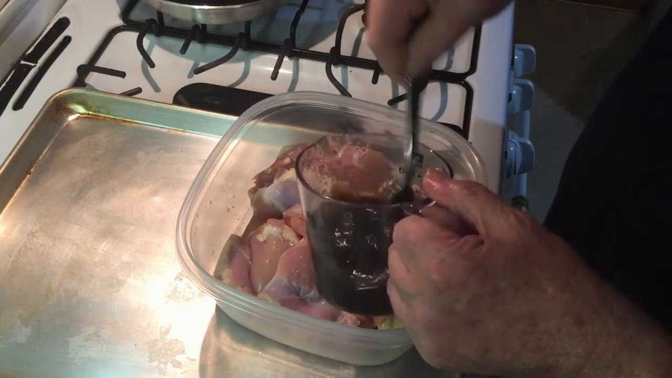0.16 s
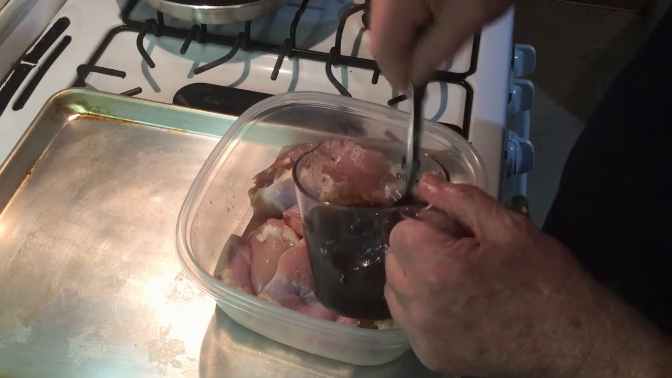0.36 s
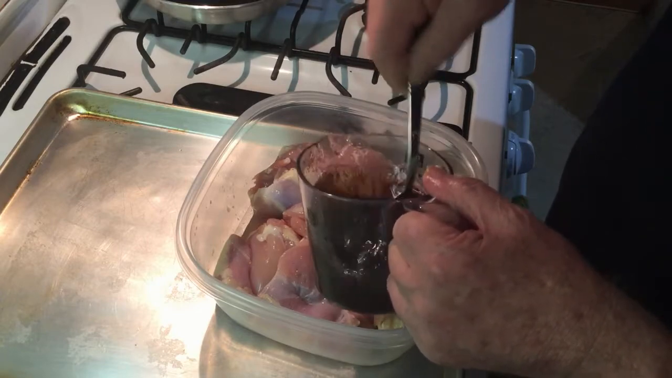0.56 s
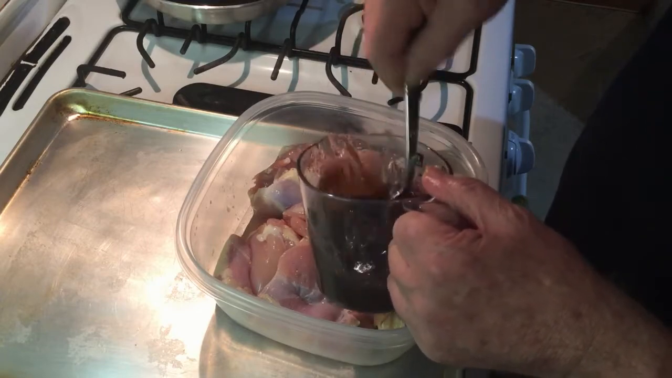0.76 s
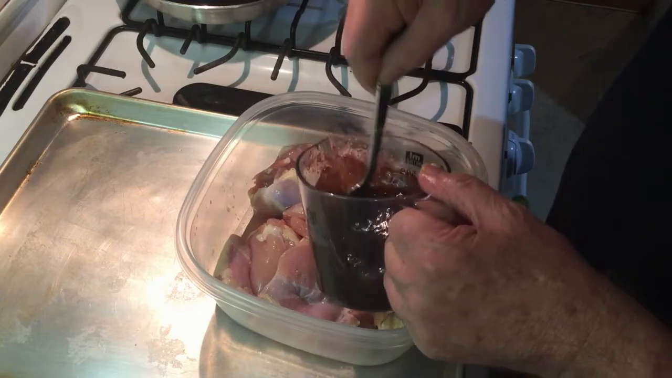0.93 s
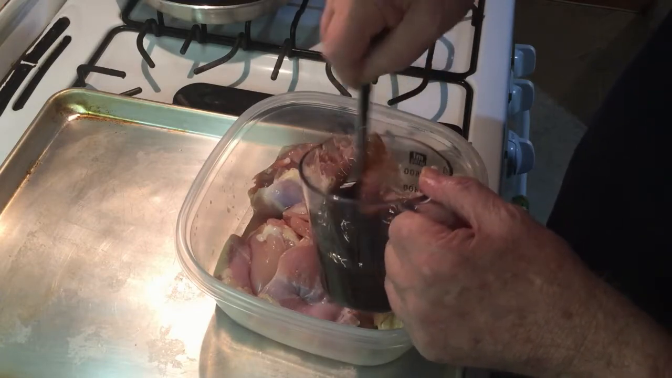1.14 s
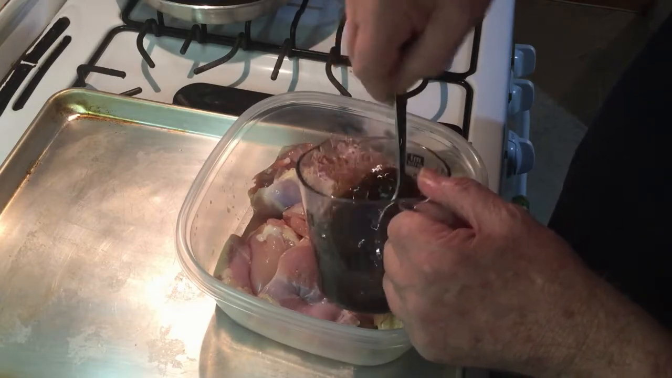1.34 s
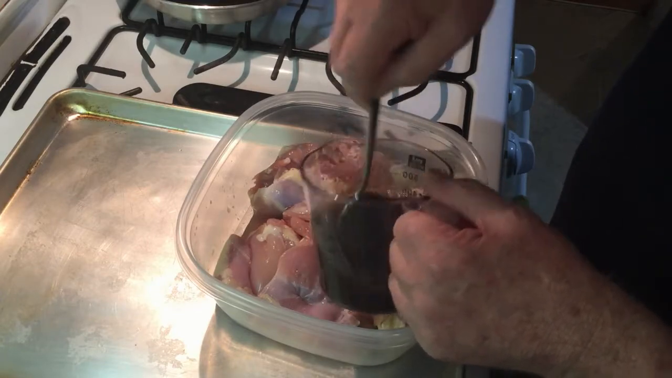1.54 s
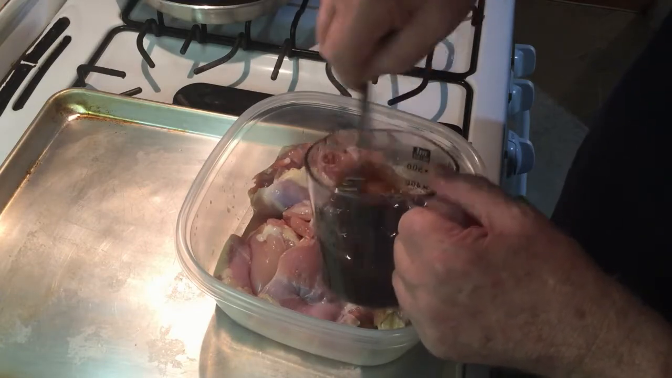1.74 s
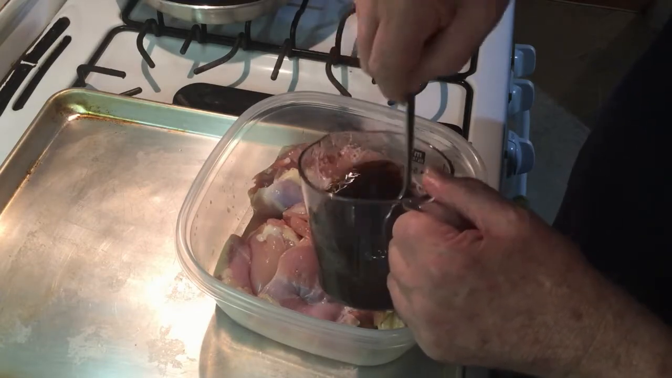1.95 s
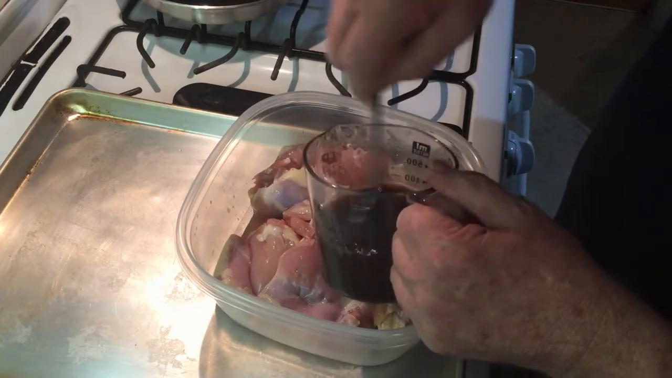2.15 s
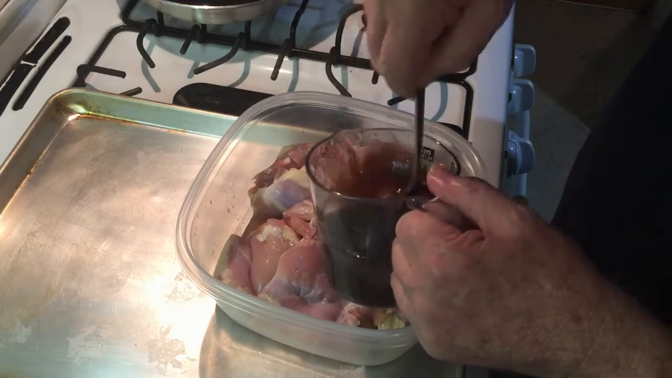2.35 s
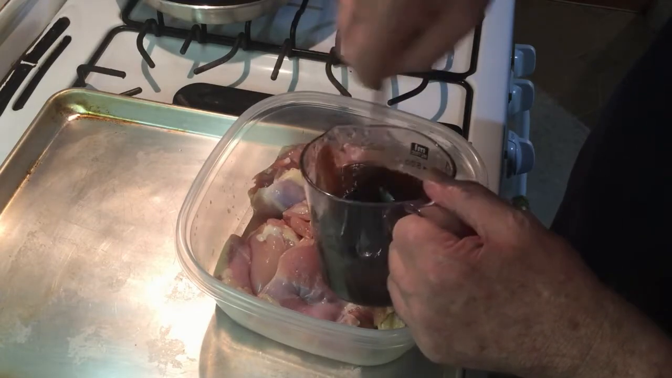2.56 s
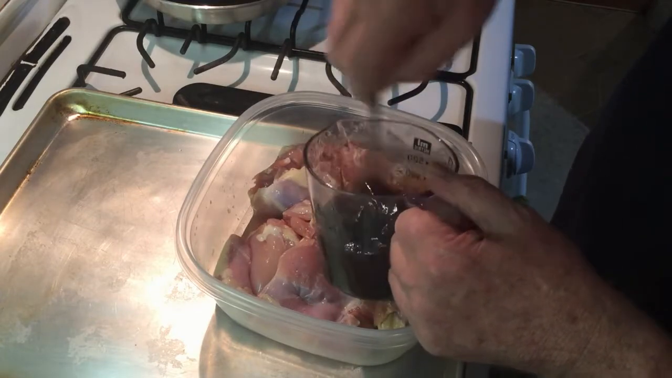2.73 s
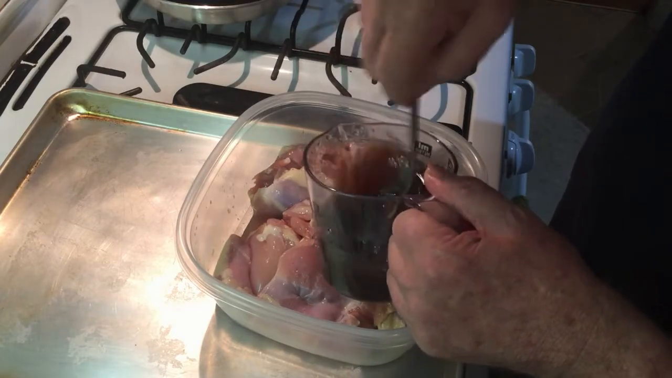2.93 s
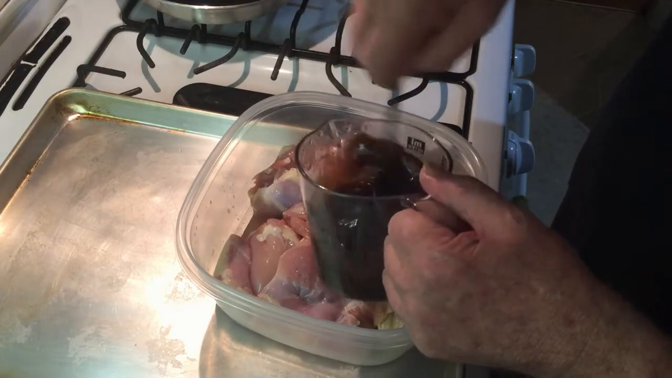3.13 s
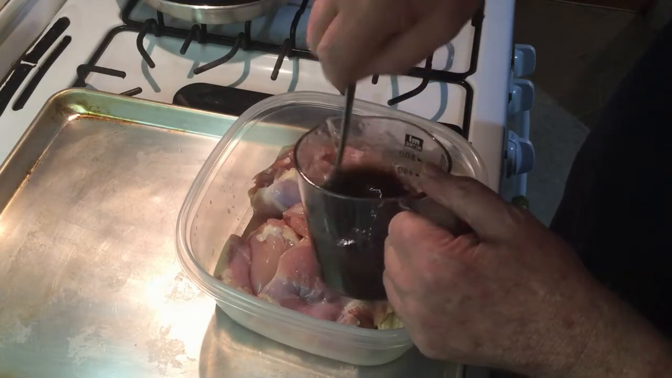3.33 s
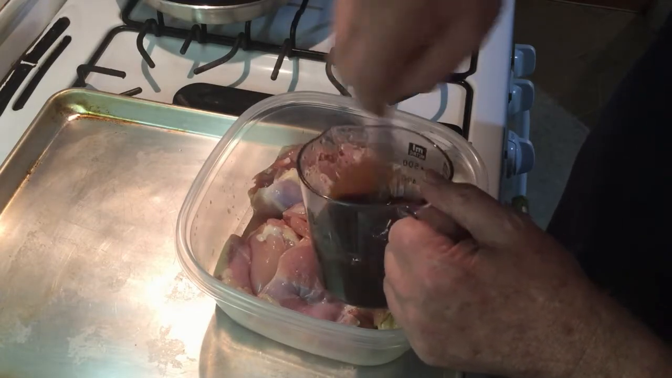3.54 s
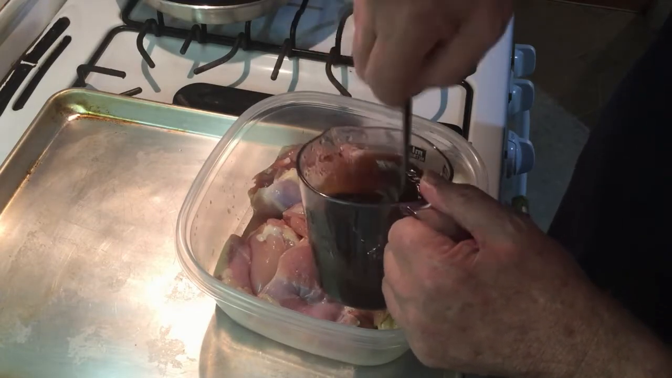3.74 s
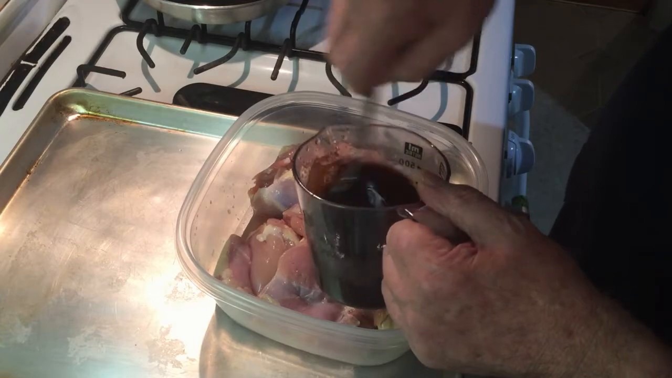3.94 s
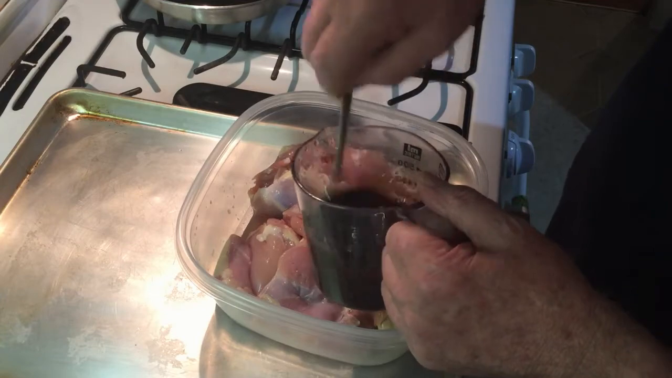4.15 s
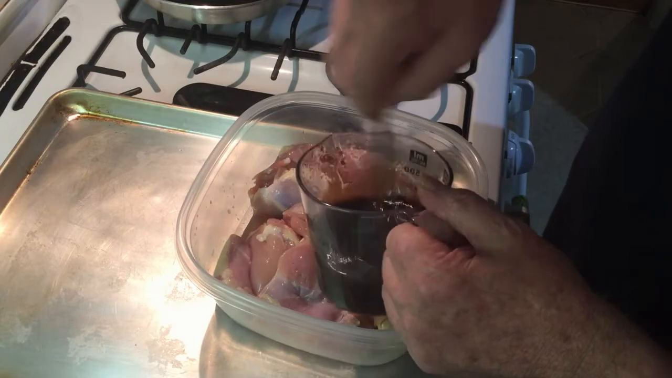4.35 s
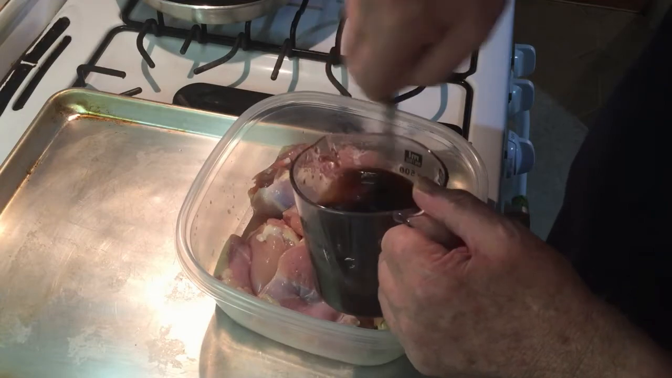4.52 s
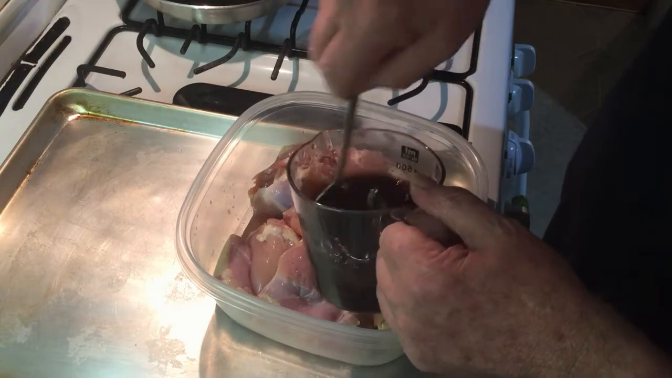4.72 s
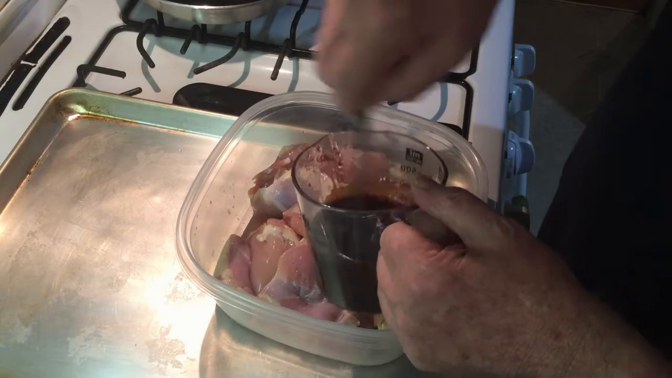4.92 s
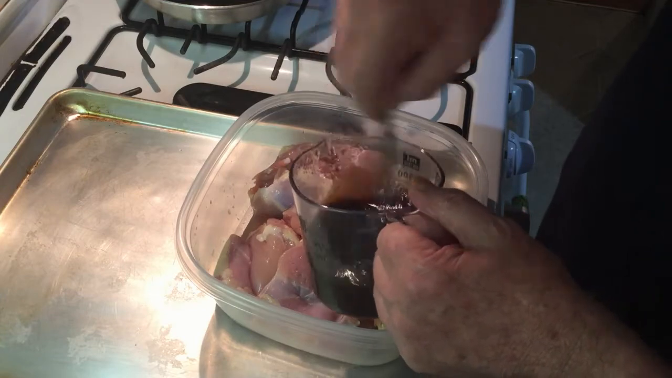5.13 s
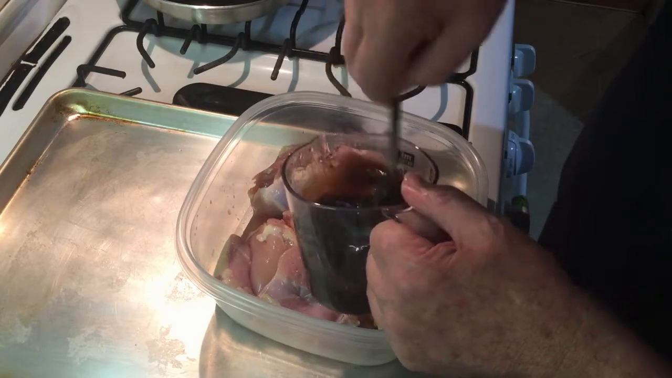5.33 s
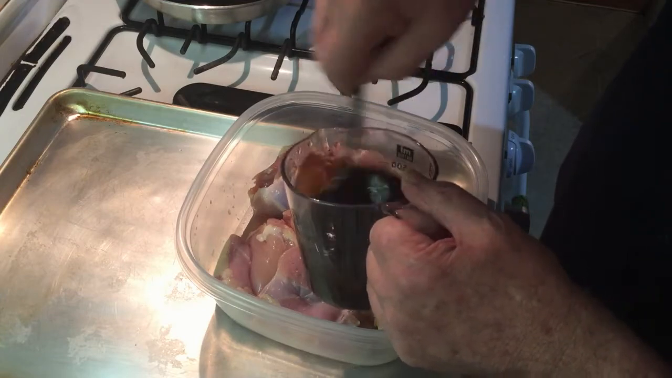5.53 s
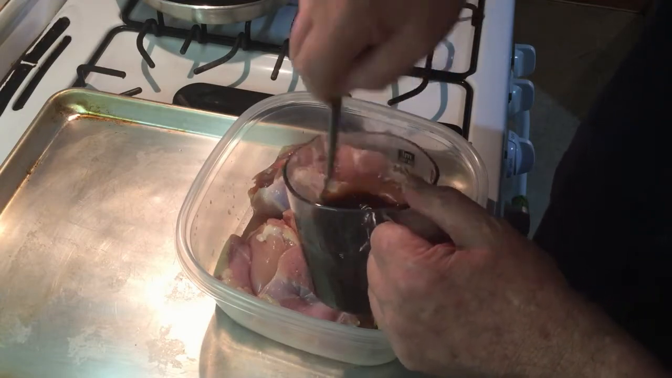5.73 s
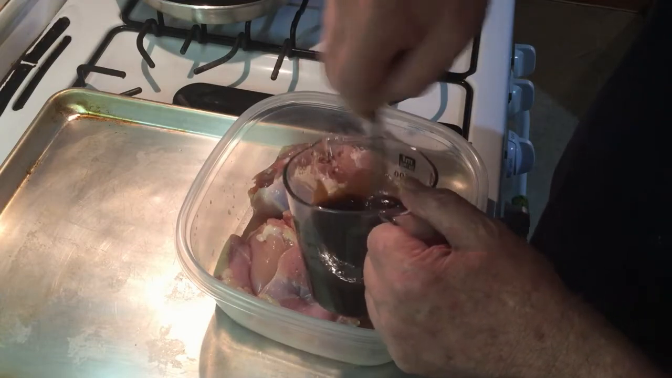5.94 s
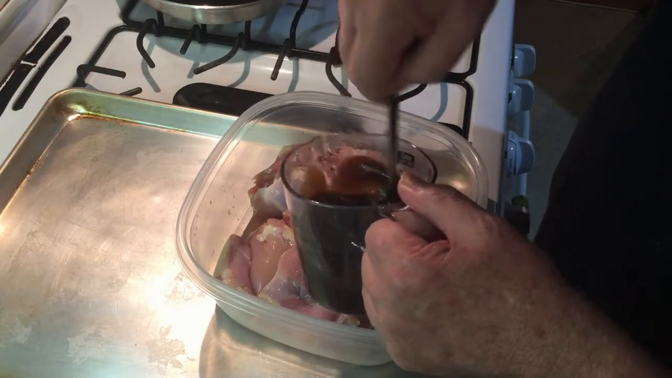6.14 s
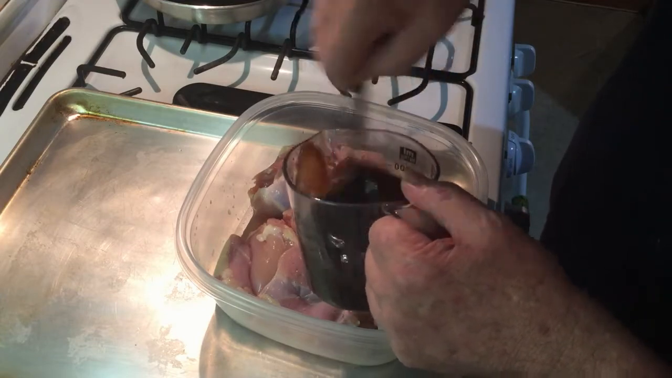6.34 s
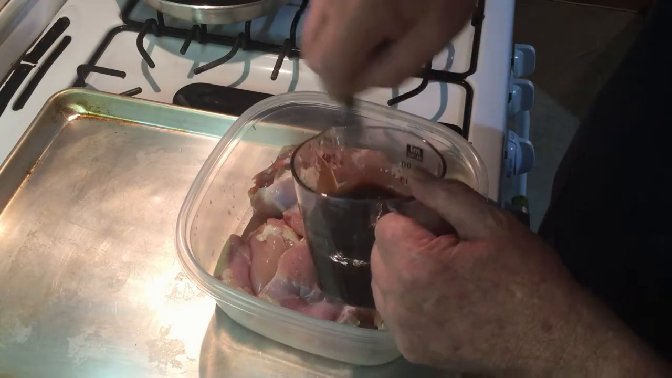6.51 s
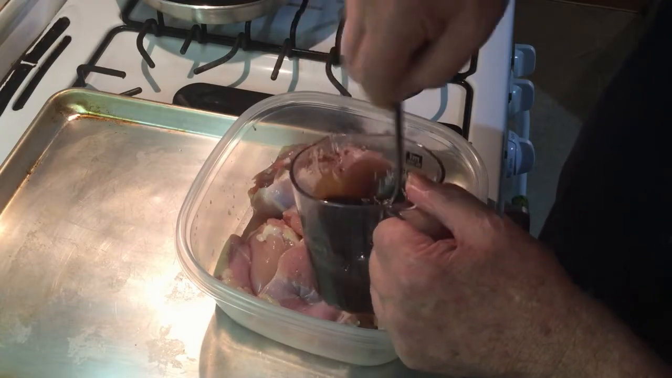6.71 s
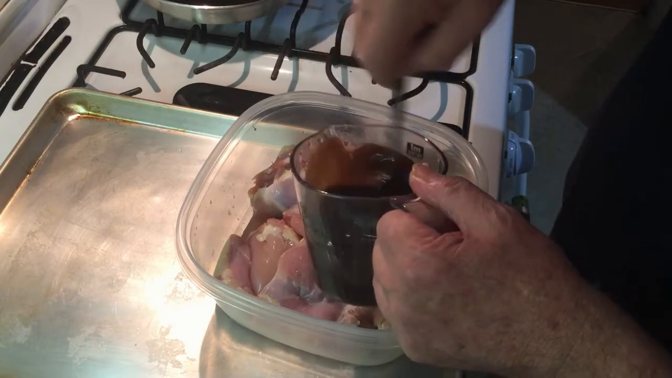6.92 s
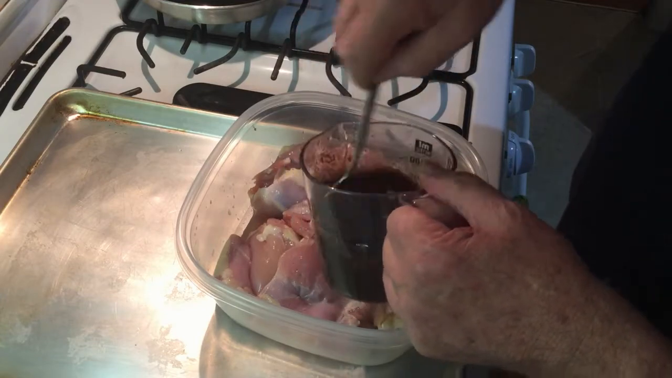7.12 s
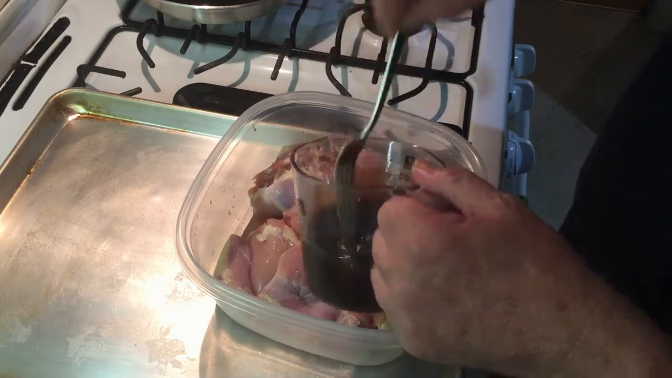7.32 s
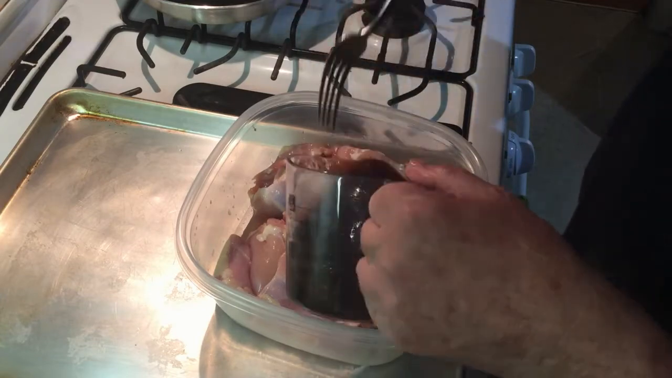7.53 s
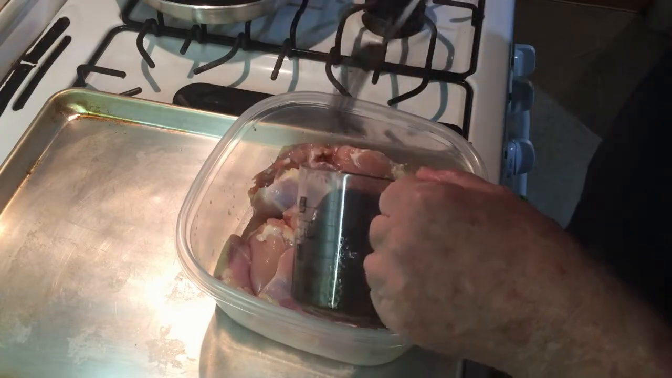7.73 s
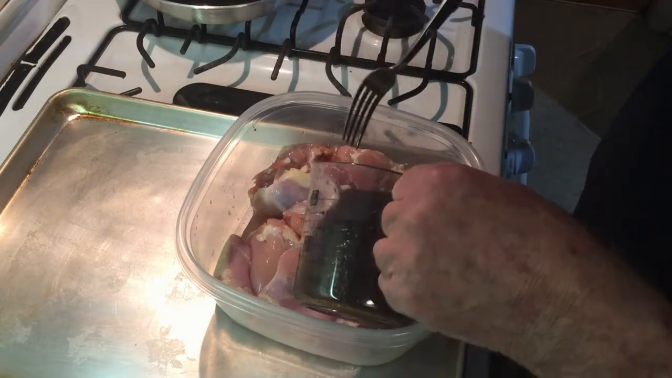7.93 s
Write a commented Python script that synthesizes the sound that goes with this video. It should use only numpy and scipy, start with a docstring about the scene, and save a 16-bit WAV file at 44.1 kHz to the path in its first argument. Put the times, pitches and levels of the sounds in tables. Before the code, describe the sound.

Close in a small, lightly echoing kitchen, a steel fork is already stirring thin sauce in a hand-held glass cup. From 0 to about 2 seconds the clacks are irregular, some sharp, others dull or glancing, with brief gritty scrapes, tiny squeaks and hollow watery plops. From about 2.3 seconds the stirring grows brisk and even, between three and four turns a second, hard clinks alternating with softer submerged taps. The liquid damps each ring to a short clack; a wet, bubbly swish surges after it and lulls before the next. Small rising gulps appear between roughly 2.8 and 4.4 seconds. The last strong clack comes near 6.9, followed by light taps and a faint click at 7.3. Stirring stops; around 7.8 and 8.0 come two soft, dull knocks on the cup, the second weaker. Faint air, low rumble and unsteady appliance hum remain underneath, the low end slightly fuller later.

```python
"""A steel fork stirs a thin sauce in a hand-held glass measuring cup, about 3.6 turns a second, in a small kitchen.
Its clacks, taps and knocks are damped resonances mixed with noise cracks; scrapes are rough noise strokes
and squeaks wavering sines. Plops and gulps are rising sines, and the swish is shifting noise with streams
of tiny bubbles that lulls before each contact and surges after each clack. The stirring stops and the cup
is knocked softly twice. Kitchen echoes surround it, over still air, rumble and a humming appliance."""
import sys
import numpy as np
from scipy import signal
from scipy.fft import rfft, irfft, next_fast_len
from scipy.io import wavfile
from scipy.ndimage import uniform_filter1d, map_coordinates

SR = 44100
rng = np.random.default_rng(int(sys.argv[2]) if len(sys.argv) > 2 else 0)


def persist_wave(psi):
    """Save psi, clipped to +-1, as 16-bit WAV."""
    counts = np.round(np.clip(psi, -1, 1) * 32767).astype(np.int16)
    wavfile.write(sys.argv[1], SR, np.atleast_2d(counts).T)


N = 355887
TIME = np.arange(N) / SR
AGE = np.arange(SR // 6) / SR  # seconds since a contact

# All levels are relative: each layer sets its own gain on top.
# fork against the wall: t/s, level/dB, body level/dB, edge level/dB, strongest ring f/Hz
CLACKS = [(0.165, -21.5, -18, -9.5, 2830), (0.2266, -23.5, -1, -14.5, 1730), (0.2375, -30, 3.5, -13, 1730),
          (0.373, -15.5, -27.5, -9, 3860), (0.5099, -23, -55, -1.5, 1960), (0.592, -17, -13, -2.5, 2770),
          (0.717, -25.5, -16.5, -10.5, 1620), (0.7835, -23, -8, -1, 3840), (0.836, -17, -17, -18, 3300),
          (0.8625, -21.5, -12, -8, 2500), (0.995, -22.5, -5, -6.5, 3770), (1.1077, -13.5, -13, -8.5, 1690),
          (1.1217, -17.5, -6.5, -22, 1630), (1.281, -22, -12.5, -19, 1600),
          (1.4816, -15.5, -7.5, -18, 2600), (1.6831, -15, -28, -5, 2070), (1.8063, -27, -15, -10.5, 2410),
          (1.9235, -24, -16, -10.5, 2930), (1.939, -26, -24.5, -0.5, 3440),
          (2.1109, -25.5, -45, -5.5, 1620), (2.193, -23.5, -21, -7, 3450), (2.298, -10, -12, -14.5, 1560),
          (2.3731, -22, -22, -15, 2100), (2.578, -16, -12, -4.5, 3180), (2.6304, -14.5, -12.5, -6, 2120),
          (2.864, -18, -12.5, -8, 2520), (2.9047, -13, -17, -9.5, 3300), (2.9678, -21.5, -41, -9.5, 2130),
          (3.118, -16.5, -9, -6.5, 2620), (3.185, -22, -12, -9, 1600), (3.413, -14.5, -14, -7.5, 3060),
          (3.4522, -15.5, -16.5, -11, 2010), (3.682, -14.5, -11, -8, 1880),
          (3.7335, -17.5, -12.5, -7.5, 1590), (3.958, -18, -11.5, -7, 2890), (4.2217, -15, -13, -4, 3000),
          (4.2575, -16, -7.5, -10, 3030), (4.47, -12, -15.5, -6.5, 3740), (4.5465, -15.5, -13, -15, 2500),
          (4.7531, -24, -7, 0.5, 2530), (4.8118, -21.5, -13, -11, 3850), (4.8693, -20.5, -15.5, -12, 3160),
          (5.0187, -15.5, -16, -6.5, 2600), (5.0731, -22, -10.5, -36, 3070), (5.143, -24, -4.5, -24, 1970),
          (5.1642, -22, -8.5, -13, 3360), (5.2888, -13, -13, -7, 3020), (5.6103, -21.5, -11, -12, 1620),
          (5.745, -22.5, -16.5, -10, 3370), (5.8322, -17.5, -12, -9, 3080),
          (5.8657, -14.5, -11, -13.5, 2850), (6.0981, -17.5, -13.5, -4, 4070),
          (6.132, -13.5, -11.5, -13, 2700), (6.1986, -20, -22, -13, 3440), (6.3767, -20, -8.5, -8.5, 2400),
          (6.3894, -11, -13.5, -10, 1610), (6.6166, -14.5, -14, -7.5, 3330),
          (6.666, -13.5, -13.5, -14.5, 1600), (6.9222, -13.5, -8.5, -8, 3450),
          (7.2935, -29.5, -31, -5, 3920)]
# tines tapping under the surface: t/s, level/dB, edge level/dB, strongest ring f/Hz
TAPS = [(0.193, -28.5, -10, 2250), (0.453, -31, -9, 2450), (0.563, -32.5, -8, 2480),
        (0.652, -26, -13, 3290), (1.2394, -24.5, -9, 3370), (1.4414, -31.5, -9.5, 1613),
        (1.5294, -29, -8.5, 3620), (2.0014, -32, -3.5, 3400), (2.4703, -23.5, -24, 2340),
        (2.6909, -20, -10.5, 3170), (2.7597, -20, -17.5, 3370), (3.037, -24, -16.5, 2290),
        (3.06, -34.5, 7, 3300), (3.2374, -25.5, -9.5, 3516), (3.31, -22.5, -37, 3280),
        (3.543, -27.5, -14, 3300), (3.567, -21, -35, 3300), (3.795, -25, -9, 3500),
        (3.8587, -21.5, -23, 3270), (4.0843, -26, -12.5, 1887), (4.1288, -22.5, -12.5, 1535),
        (4.335, -22, -16, 3170), (4.384, -28, -14.5, 3220), (4.5996, -25.5, -5.5, 3310),
        (4.6656, -18, -13.5, 3480), (4.683, -25.5, -18, 3420), (4.9403, -24, -28.5, 3360),
        (4.9605, -32.5, -5, 3380), (5.2102, -22.5, -17, 3430), (5.225, -23.5, -21, 3400),
        (5.355, -28.5, -11.5, 3636), (5.4152, -24, -13, 3400), (5.4751, -18, -19, 2214),
        (5.6721, -21, -12.5, 3400), (5.9433, -25, -12, 3260), (6.01, -23.5, -16.5, 2306),
        (6.2899, -25, -11, 2350), (6.4663, -21.5, -14.5, 3670), (6.548, -27, -21, 3400),
        (6.725, -23.5, -12, 3140), (6.738, -21, -10, 3350), (6.823, -29, -19.5, 3290),
        (6.9977, -23.5, -9, 3090), (7.0313, -28.5, -22, 3240), (7.1047, -31.5, -28, 2240),
        (7.133, -42, 8, 3400)]
# tines sliding along the wall: t/s, length/s, level/dB
SCRAPES = [(0.102, .025, -47), (0.337, 0.078, -45), (0.549, 0.02, -48.5), (0.947, 0.0058, -34),
           (1.204, 0.039, -42.5), (1.341, 0.034, -46), (1.615, 0.049, -47), (1.812, 0.039, -39),
           (2.275, 0.015, -36.5), (2.35, 0.022, -38.5), (4.649, 0.017, -35.5), (5.139, 0.036, -38),
           (5.564, 0.011, -36.5)]
# a dragged tine sticks and slips, so that one resonance sings out: t/s, length/s, level/dB, f/Hz
SQUEAKS = [(0.637, 0.03, -37.5, 946), (0.783, 0.0028, -14.5, 3840), (0.829, 0.018, -31.5, 2636),
           (1.502, 0.029, -41, 1090), (1.881, 0.039, -42, 1064), (2.335, 0.036, -39.5, 927),
           (4.959, 0.0068, -25, 3420), (5.165, 0.018, -32.5, 3384)]
# air pockets closing in the fork's wake: t/s, level/dB, starting f/Hz
PLOPS = [(0.231, -16.5, 1162), (0.376, -20.5, 1026), (0.511, -24.5, 1600), (0.594, -15.5, 1278),
         (0.75, -19, 1123), (0.785, -20, 1310), (0.998, -20.5, 1330), (1.002, -25, 796),
         (1.111, -15.5, 1180), (1.442, -17, 1557), (1.683, -12.5, 2150), (2.299, -10.5, 1426),
         (2.761, -16, 2210), (4.258, -19, 888), (4.755, -15, 2453), (5.165, -18, 917), (5.475, -15, 2200),
         (5.865, -16.5, 914), (6.011, -18.5, 2275), (6.134, -21, 1140), (6.378, -12.5, 1265),
         (6.925, -15, 895), (7.057, -25.5, 2270)]
# bubbles that burst as they rise: t/s, level/dB, starting f/Hz, nominal glide/(octaves per s)
GULPS = [(0.104, -36.5, 1142, 9), (2.765, -33.5, 796, 49), (3.318, -23.5, 1107, 52), (3.598, -25, 885, 77),
         (3.869, -23.5, 788, 69), (4.135, -21, 918, 99), (4.406, -29, 1290, 136), (7.316, -46.5, 746, 19)]
# soft knocks on the cup: t/s, level/dB
KNOCKS = [(7.839, -24), (8.037, -30.5)]
# resonances of the filled cup struck by the fork: f/Hz, level/dB, t60/s
GLASS_MODES = [(698.3, -6, 0.053), (953.5, -7.5, 0.087), (1108, -5.5, 0.1), (1616, -3, 0.028),
               (1997, -7, 0.05), (2254, -9, 0.075), (2492, -1, 0.038), (3012, 1, 0.031), (3360, -6, 0.045),
               (3718, 7, 0.016), (3978, -2.5, 0.029), (4270, 4.5, 0.0096), (6000, 4.5, 0.0072),
               (6710, -0.5, 0.029), (6750, 0.5, 0.0042), (8956, -5.5, 0.024)]
# resonances of the tines in the liquid: f/Hz, level/dB, t60/s
TINE_MODES = [(1022, 1, 0.009), (2001, -15, 0.071), (2357, -8.5, 0.032), (3343, -2.5, 0.024),
              (3505, -13, 0.062), (6220, -5, 0.013), (6874, -11, 0.007)]
# resonances of the tilted cup: f/Hz, level/dB, t60/s
CUP_MODES = [(605, 0.5, 0.046), (716, 2.5, 0.058), (658, -11, 0.21), (1744, -21, 0.017)]
# resonances that the drag keeps ringing: f/Hz, level/dB
SINGING_MODES = [(915, -12.5), (1100, -13), (2375, -14.5)]
# spectrum of steel cracking on glass: f/Hz, level/dB
CRACK_SPECTRUM = [(100, -41.5), (250, -18.5), (500, 1.5), (900, 9.5), (3500, 8.5), (6500, 4), (9000, 0),
                  (13000, -5.5), (16000, -20.5)]
# spectrum of tines sliding on wet glass: f/Hz, level/dB
SLIDE_SPECTRUM = [(700, -31.5), (1800, 2), (3500, 0.5), (6500, -2), (10000, -10.5), (15000, -22)]
# spectrum of the stirred liquid: f/Hz, level/dB
SWISH_SPECTRUM = [(120, -47), (300, 3.5), (480, -10.5), (700, -6.5), (1050, 10.5), (1400, -28), (2300, 0),
                  (3500, 6), (4800, -7), (6400, 2.5), (9000, -14), (15000, -23)]
# how briskly the fork is stirred: t/s, swish level/dB
EFFORT = [(0.0, -42), (0.21, -53.5), (0.67, -46), (1.46, -61), (2.09, -54.5), (2.48, -44), (3.7, -45),
          (4.39, -42.5), (4.99, -45), (6.87, -47), (7.21, -53.5), (7.35, -52), (7.5, -101.5)]
# decay of the room's tail: f/Hz, t60/s
ROOM_DECAY = [(200, 0.097), (1000, 0.42), (4000, 0.32), (8000, 0.27), (15000, 0.19)]
# appliance hum, before its lift: f/Hz, level/dB
HUM = [(76, -82), (219, -81)]
# lift of hum and rumble: t/s, level/dB
LOW_END_LIFT = [(4.5, 6), (6, 6.5), (8, 9)]
# spectrum of the still air: f/Hz, level/dB
AIR_SPECTRUM = [(22, -46.5), (45, -14.5), (75, -23), (230, -13.5), (400, -20), (734, -26.5), (4370, -36.5),
                (16000, -49.5)]

SURGE_RISE_S = 0.0052  # time constant: the drag builds as the fork meets the wall
LULL_S, LULL_DB = 0.053, -1  # time constant of the lull before a contact, and what each contact adds to it
LINGER_CYCLES = 280  # t60 of a plop's after-ring, in cycles: low plops hang longest
TOP_HZ = 16600  # upper band limit


def clacks(gain_db=-23.5, crack_db=-1, heavy_db=4, hard_db=3, lead=.0007, graze_db=-23):
    """The fork strikes the wall; hand and sauce stop most of the ring within a few hundredths of a second."""
    out = np.zeros(N)
    for s, db, body_db, edge_db, hz in CLACKS:
        tone = ring(GLASS_MODES, scatter_db=2, detune=0.024, focus_hz=hz, focus_db=9.5)
        rattle = unit(chatter(crack(t60=0.052), spread=.0008, count=2))
        hit = tone + amp(crack_db) * rattle
        clack = voiced(hit, 0.00081, body_db + heavy_db, edge_db + hard_db, snap=13.0)
        add(out, s - lead, amp(db + gain_db) * clack)
        # a dull, glancing blow slides into contact; a hard one arrives clean
        glancing = np.clip(-edge_db / 10, 0, 1) ** 2
        add(out, s - AGE[-1], amp(db + graze_db) * glancing * graze(rise=0.0085))
    return out


def taps(gain_db=-21, crack_db=-6, body_db=-22, hard_db=0, lead=0.001015, graze_db=-21):
    """Cushioned by the liquid, the tines sound with little snap, each after a short graze."""
    out = np.zeros(N)
    for s, db, edge_db, hz in TAPS:
        tone = ring(TINE_MODES, scatter_db=3, detune=.011, focus_hz=hz, focus_db=7)
        rattle = unit(chatter(crack(t60=0.035), spread=0.0027, count=2))
        hit = tone + amp(crack_db) * rattle
        tap = voiced(hit, 0.00078, body_db, edge_db + hard_db, snap=.3)
        add(out, s - lead, amp(db + gain_db) * tap)
        add(out, s - AGE[-1], amp(db + graze_db) * graze(rise=0.0095))
    return out


def ring(modes, scatter_db, detune, focus_hz=1000, focus_db=0):
    """Decaying modes, varied at random from hit to hit; the contact point favours those near focus_hz."""
    hz, db, t60 = np.transpose(modes)[:, :, None]
    level, shift, phase = rng.standard_normal((3, len(modes), 1))
    favour = focus_db * np.exp(-(np.log2(hz / focus_hz) / 0.18) ** 2)
    waves = np.sin(2 * np.pi * (hz * (1 + detune * shift) * AGE + phase))
    gains = amp(db + favour + scatter_db * level)
    return unit(np.sum(gains * fade(AGE, t60) * waves, axis=0))


def crack(t60):
    """A brief burst of noise, as steel meets glass."""
    return unit(colour(rng.standard_normal(len(AGE)), CRACK_SPECTRUM) * fade(AGE, t60))


def chatter(hit, spread, count):
    """The tines land one after another at random strengths, the later ones tending to be stronger."""
    out = hit.copy()
    for k, gap in enumerate(np.cumsum(rng.uniform(.3, 1, count))):
        add(out, gap * spread, hit * rng.uniform(0.4, 1) * 1.6 ** k)
    return out


def voiced(hit, attack, body_db, edge_db, snap):
    """A heavy contact has more body, a hard one more edge, with a snap in its first instant."""
    hit = hit * (1 - np.exp(-(AGE / attack) ** 2))
    body = band(band(hit, 1400, "low", order=6), 220, "high", order=4)
    middle = band(hit, [1400, 5000], "band", order=3)
    edge = band(hit * (1 + snap * np.exp(-AGE / .0012)), 5000, "high", order=6)
    return amp(body_db) * unit(body) + unit(middle) + amp(edge_db) * unit(edge)


def graze(rise):
    """Steel scrapes along the glass, growing louder up to the moment it strikes."""
    return colour(rng.standard_normal(len(AGE)), CRACK_SPECTRUM) * np.exp(-AGE[::-1] / rise)


def scrapes(gain_db=0, attack=0.0028, release_t60=0.058, rough_db=4):
    """Steel slides on wet glass in short, rough strokes of noise."""
    out = np.zeros(N)
    for s, length, db in SCRAPES:
        shape = (1 - np.exp(-AGE / attack)) * fade(np.maximum(AGE - length, 0), release_t60)
        add(out, s, amp(db + gain_db) * shape)
    grit = unit(amp(rough_db * wobble(450)))
    return out * colour(rng.standard_normal(N), SLIDE_SPECTRUM) * grit


def squeaks(gain_db=0, attack=0.0013, release_t60=0.025, waver=0.036, rough_db=2):
    """Short, nearly pure notes that waver as the tine slips."""
    out = np.zeros(N)
    for s, length, db, hz in SQUEAKS:
        bend, grain = (flutter(150) for _ in range(2))
        shape = (1 - np.exp(-(AGE / attack) ** 2)) * fade(np.maximum(AGE - length, 0), release_t60)
        note = np.sin(2 * np.pi * np.cumsum(hz * (1 + waver * bend)) / SR)
        add(out, s, amp(db + gain_db + rough_db * grain) * shape * note)
    return out


def flutter(hz):
    """Quick random wavering over the life of one contact, at rms 1."""
    return unit(band(rng.standard_normal(len(AGE)), hz, "low", order=2))


def bubbles(plop_db=-5, burst_hz=3600, linger_db=-16, quicken_s=0.018):
    """Short plops that die away in a rough blur, and gulps that sweep upwards until they burst."""
    out = np.zeros(N)
    for s, db, hz in PLOPS:
        blur = flutter(hz / 20) * np.sin(2 * np.pi * hz * AGE)
        linger = amp(linger_db) * fade(AGE, LINGER_CYCLES / hz) * blur
        add(out, s, amp(db + plop_db) * (bubble(hz, glide=5, swell=0.0022) + linger))
    for s, db, hz, glide in GULPS:
        climb = glide * (1 + AGE / quicken_s) / 2  # the rise quickens near the surface
        alive = np.clip((np.log2(burst_hz / hz) / climb - AGE) / 0.003 + 1, 0, 1)
        broken = np.clip(AGE * glide / 2, 0, 1)  # the note roughens into a splash as it climbs
        texture = np.cos(broken) + np.sin(broken) * flutter(220)
        add(out, s, amp(db) * bubble(hz, climb, swell=0.0064) * alive * texture)
    return band(out, 300, "high", order=2)


def bubble(hz, glide, swell, age=AGE):
    """A sine that peaks after swell seconds and climbs as the bubble nears the surface."""
    pitch = np.minimum(hz * 2 ** (glide * age), SR / 4)
    return np.sin(2 * np.pi * np.cumsum(pitch) / SR) * age / swell * np.exp(1 - age / swell)


def sauce(swish_db=-6, blip_db=-9, fizz_db=-15, slosh_db=-24, scrape_db=-14):
    """Stirred liquid: an uneven swish full of tiny bubbles and ticks, and the cup singing faintly.
    Hard clacks go on into a gritty scrape along the glass; heavy ones set the sauce sloshing."""
    _, db, body_db, edge_db, _ = np.transpose(CLACKS)
    flow = drag(db, swirl_db=-1.0, surge_db=-46, grows=1.0, t60=0.56)
    slide = drag(db + edge_db, swirl_db=-3.0, surge_db=-55.5, grows=0.54, t60=0.29)
    heave = drag(db + body_db, swirl_db=-10.5, surge_db=-35, grows=0.3, t60=0.3)
    grain = unit(amp(6.5 * np.tanh(wobble(70)) + 3.2 * wobble(450)))
    rush = colour(patchy(depth_db=5.5), SWISH_SPECTRUM) * grain
    gurgle = blips(rate=90, centre_hz=2080, spread=1.18, cycles=2.4, size_db=7.5)
    chirps = amp(-10) * blips(rate=28, centre_hz=2300, spread=.9, cycles=7, size_db=8)
    ticks = amp(-9) * skitter(rate=40, size_db=10, count=4)
    fizz = blips(rate=500, centre_hz=6500, spread=.8, cycles=2.5, size_db=10)
    slosh = blips(rate=110, centre_hz=399.0, spread=0.6, cycles=1.67, size_db=16.0)
    scrape = colour(skitter(rate=400, size_db=16, count=3), SLIDE_SPECTRUM)
    swish = amp(swish_db) * rush + amp(blip_db) * gurgle + chirps + ticks
    grit = amp(fizz_db) * fizz + amp(scrape_db) * scrape
    return flow * swish + slide * grit + heave * (amp(slosh_db) * slosh + singing())


def drag(force_db, swirl_db, surge_db, grows, t60):
    """A swirl that follows the effort, lulls before each contact and surges with a clack's force."""
    lull, surges = np.zeros((2, N))
    t = np.arange(-SR // 4, SR // 2) / SR
    shape = np.exp(np.minimum(t, 0) / SURGE_RISE_S) * fade(np.maximum(t, 0), t60)
    for (s, *_), db in zip(CLACKS, force_db - np.median(force_db)):
        add(surges, s + t[0], (amp(surge_db + grows * db) * shape) ** 2)
    for s, *_ in CLACKS + TAPS:
        add(lull, s + t[0], np.exp(t[t < 0] / LULL_S))
    effort_db = np.interp(TIME, *np.transpose(EFFORT), right=-120)
    swirl = amp(effort_db + swirl_db + LULL_DB * lull)
    return np.sqrt(swirl ** 2 + surges)  # swirl and surges add as powers


def patchy(depth_db):
    """Noise whose colour shifts from moment to moment."""
    z = signal.stft(rng.standard_normal(N), nperseg=512)[2]
    field = uniform_filter1d(rng.standard_normal(z.shape), size=7, axis=0)  # smooth over frequency
    field = uniform_filter1d(field, size=4, axis=1)  # smooth over time
    return signal.istft(z * amp(depth_db * np.tanh(unit(field))), nperseg=512)[1][:N]


def blips(rate, centre_hz, spread, cycles, size_db):
    """A random stream of tiny bubbles, rate a second; the higher ones die sooner."""
    out = np.zeros(N)
    for when, pitch, size, climb in rng.random((int(rate * N / SR), 4)):
        hz = centre_hz * 2 ** (spread * (2 * pitch - 1))
        blip = bubble(hz, 40 * climb, cycles / hz, AGE[:SR // 30])
        add(out, when * N / SR, amp(size_db * size ** 2) * blip)
    return unit(out)


def skitter(rate, size_db, count):
    """The tines skip along the glass: a random stream of tiny ticks, with a different ring for each tine."""
    out = np.zeros(N)
    for _ in range(count):
        when, size = rng.random((int(rate * N / SR / count), 2)).T
        touches = np.bincount((when * N).astype(int), amp(size_db * size ** 2), N)
        tick = ring(TINE_MODES, scatter_db=2, detune=.02) + 2 * crack(t60=.02)
        out += signal.fftconvolve(touches, band(tick, 1300, "high", order=2))[:N]
    return unit(out)


def singing(width_hz=28, swell_db=2.5, drift=.03):
    """The cup's narrow resonances swell and fade, and their pitch drifts with the swirling surface."""
    out = np.zeros(N)
    for hz, db in SINGING_MODES:
        phase = 2 * np.pi * np.cumsum(hz * (1 + drift * wobble(5.5))) / SR
        slow_noise = band(rng.standard_normal(N), width_hz, "low", order=2)
        out += amp(db) * unit(slow_noise * amp(swell_db * wobble(9.6))) * np.sin(phase)
    return out


def knocks(gain_db=-22, crack_db=-6, low_hz=520, high_hz=1300):
    """Dull, rough blows that wake mostly the cup's lowest modes."""
    out = np.zeros(N)
    for s, db in KNOCKS:
        tone = ring(CUP_MODES, scatter_db=1, detune=.004)
        tone = tone * (1 - np.exp(-AGE / .002)) * (1 + .5 * flutter(70))  # soft start, rough level
        rattle = chatter(crack(t60=0.016), spread=0.004, count=1)
        tick = unit(band(rattle, [low_hz, high_hz], "band", order=1))
        add(out, s, amp(db + gain_db) * (tone + amp(crack_db) * tick))
    return out


def kitchen(x, near_db=-9, near_t60=0.035, tail_db=-11):
    """Quick echoes off stove top and tray, then the room's tail: decaying noise, redrawn every quarter second."""
    out, size = np.zeros(N), SR // 4
    age = np.arange(SR // 2) / SR
    for i in range(0, N, size):
        hz, t, z = signal.stft(rng.standard_normal(len(age)), SR, nperseg=256)
        decay = fade(t, along(ROOM_DECAY, hz)[:, None])
        tail = signal.istft(z * decay, SR, nperseg=256)[1][:len(age)]
        near = rng.standard_normal(len(age)) * fade(age, near_t60)
        echo = (amp(near_db) * unit(near) + amp(tail_db) * unit(tail)) / np.sqrt(len(age))
        add(out, i / SR + .003, signal.fftconvolve(x[i:i + size], echo))
    return out


def background(air_db=-67):
    """Still air, a low rumble and a faint unsteady appliance hum; the low end grows in the second half."""
    hum = np.zeros(N)
    for hz, db in HUM:
        level = amp(db + 1.3 * wobble(20.0)) * np.sqrt(2)
        hum += level * np.sin(2 * np.pi * hz * TIME + 0.58 * wobble(0.93))
    rumble = amp(-84.0) * unit(band(rng.standard_normal(N), [42, 120], "band", order=2))
    lift = amp(np.interp(TIME, *np.transpose(LOW_END_LIFT)))
    return (hum + rumble) * lift + amp(air_db) * colour(rng.standard_normal(N), AIR_SPECTRUM)


def amp(db):
    """Decibels to gain."""
    return 10 ** (np.asarray(db) / 20)


def unit(x):
    """x at rms 1."""
    return x / np.sqrt(np.mean(x ** 2) + 1e-20)


def fade(t, t60):
    """Exponential decay, down 60 dB after t60 seconds."""
    return amp(-60 * t / t60)


def along(points, hz):
    """Read (f/Hz, value) points on a log frequency axis."""
    f, v = np.transpose(points)
    return np.interp(np.log(hz + 1), np.log(f), v)


def colour(x, spectrum):
    """x shaped by (f/Hz, level/dB) points, at rms 1."""
    m = next_fast_len(len(x))
    gains = amp(along(spectrum, np.fft.rfftfreq(m, 1 / SR)))
    return unit(irfft(rfft(x, m) * gains, m)[:len(x)])


def band(x, edges, kind, order):
    """Causal Butterworth filter."""
    return signal.sosfilt(signal.butter(order, edges, kind, fs=SR, output="sos"), x)


def wobble(rate):
    """A smooth random curve, rate knots a second."""
    return map_coordinates(rng.standard_normal(int(N * rate / SR) + 4), [TIME * rate])


def add(track, s, sound):
    """Mix a sound into the track at s seconds."""
    part = track[max(round(s * SR), 0):][:len(sound)]
    part += sound[:len(part)]


def scene(knock_room_db=-2):
    """Fork, cup and sauce in the kitchen; the soft knocks stay drier."""
    near = clacks() + taps() + scrapes() + squeaks() + bubbles() + sauce()
    cup = knocks()
    room = kitchen(near + amp(knock_room_db) * cup)
    return (near + cup + room + background())[None]


def record(dry):
    """Cut everything from the upper band limit upwards."""
    m = next_fast_len(N + SR // 4)
    kept = np.fft.rfftfreq(m, 1 / SR) < TOP_HZ
    return irfft(rfft(dry, m) * kept, m)[:, :N]


dry = scene()
out = record(dry)
persist_wave(out)
```